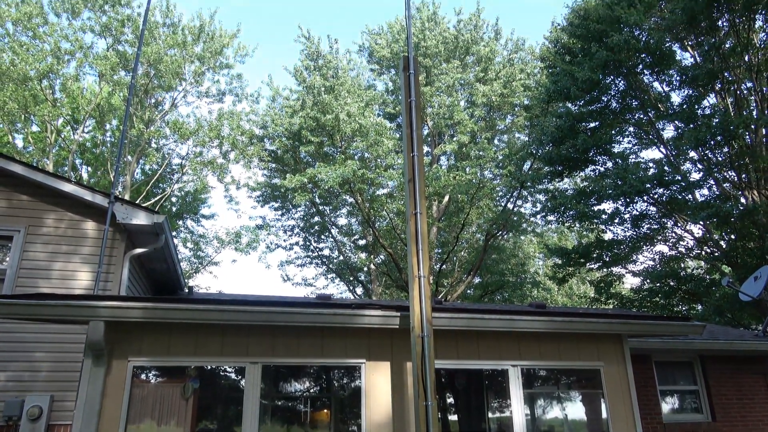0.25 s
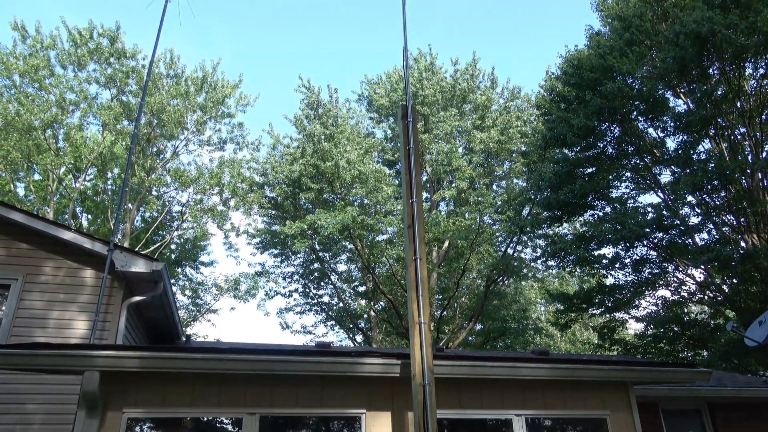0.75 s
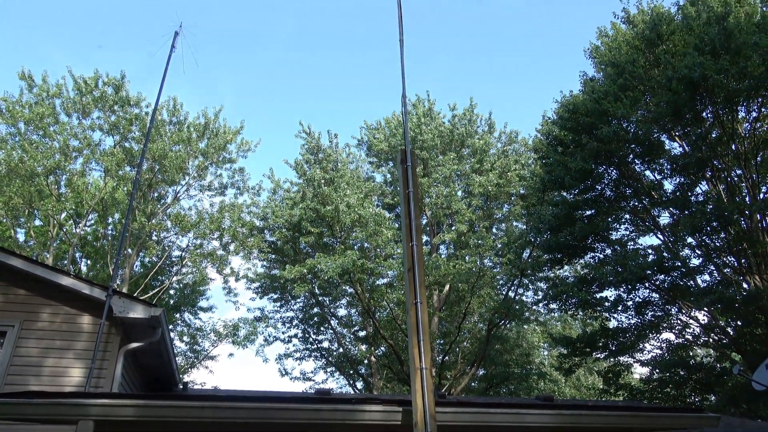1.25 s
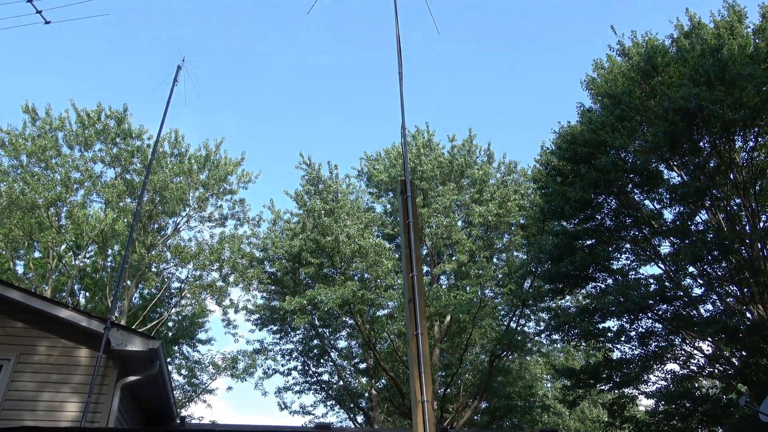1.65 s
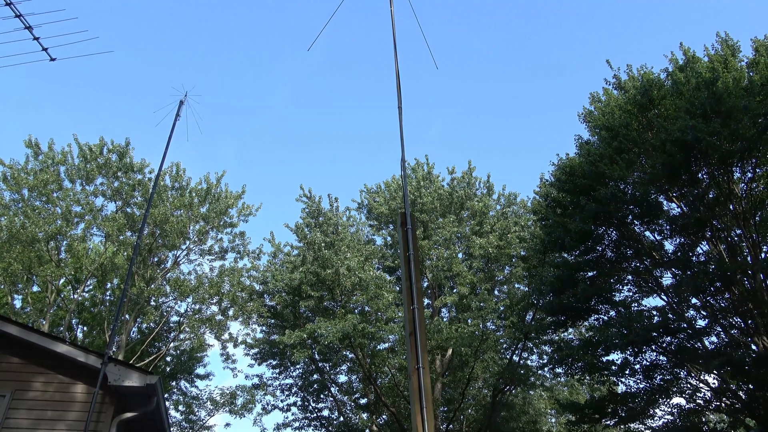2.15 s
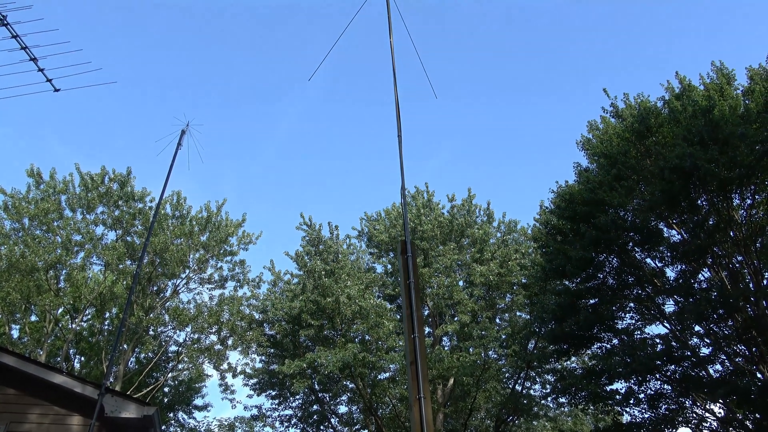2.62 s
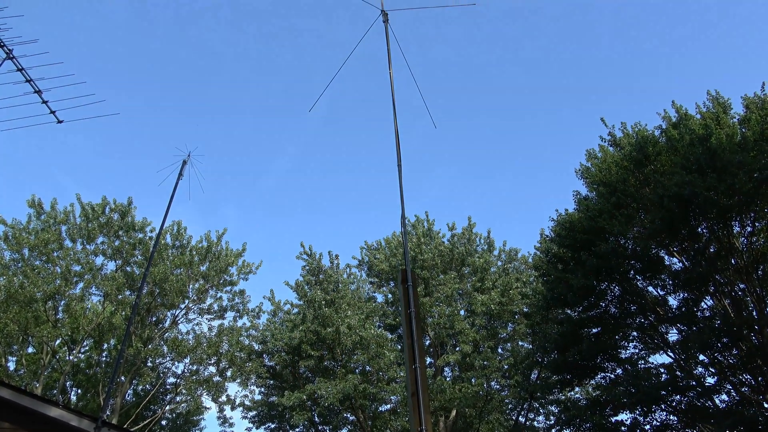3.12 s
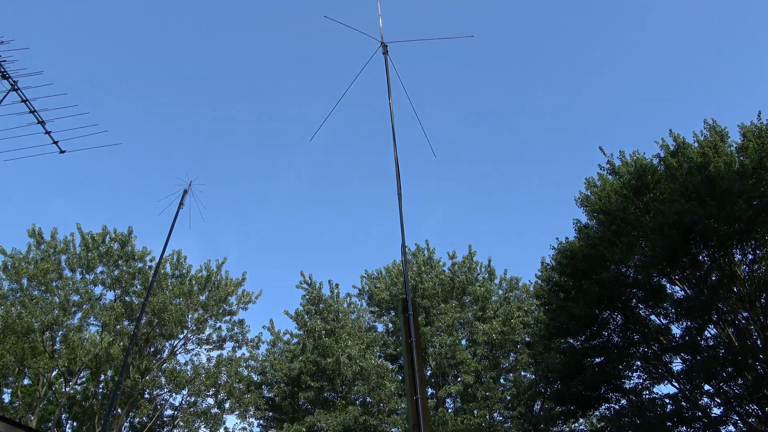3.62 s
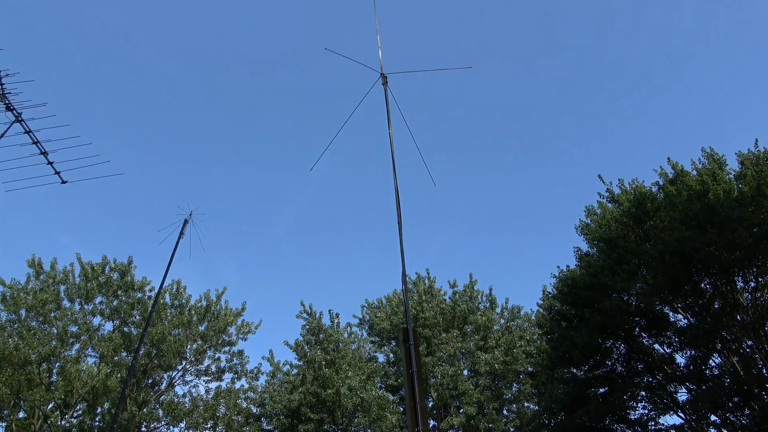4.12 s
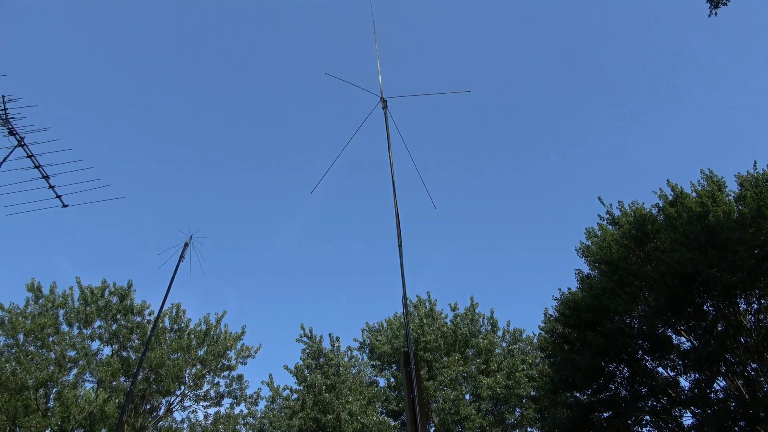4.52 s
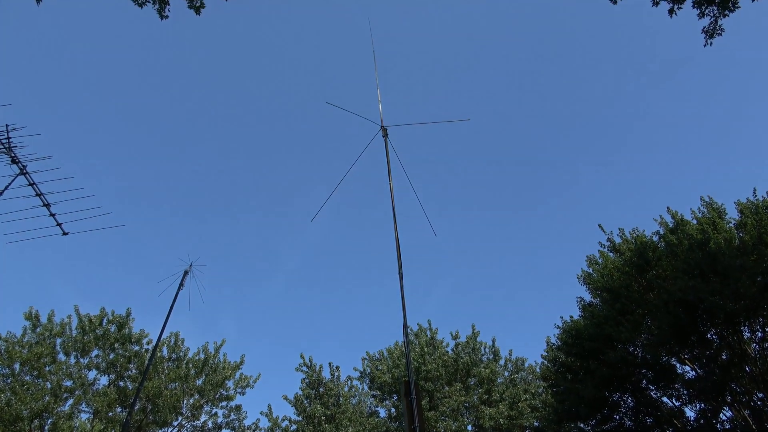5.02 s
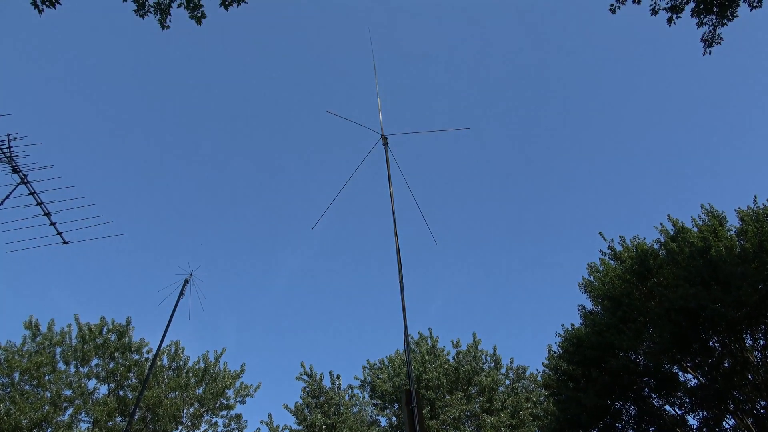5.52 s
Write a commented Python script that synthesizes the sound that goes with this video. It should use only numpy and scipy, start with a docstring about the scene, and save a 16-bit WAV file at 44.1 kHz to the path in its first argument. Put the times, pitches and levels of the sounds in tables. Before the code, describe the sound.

In a tree-lined garden beside a house, a nearby songbird whistles two short falling calls, then sings a long run of quick, high repeated chirps that slows a little. Each note echoes lightly off the wall. Other birds twitter faintly further off, over steady town rumble, hiss and a soft swell of distant traffic. Near the end the hand-held microphone picks up soft thumps and a click.

```python
"""Songbird in a town garden

A near bird whistles two falling calls, then a run of slur-and-chirp syllables that slows to a drawl.
A house wall throws each note back; other birds call further off, half lost in the leaves.
Town rumble, hiss and a swell of traffic lie under it; the hand-held camera clicks and thumps."""
import sys
import numpy as np
from scipy import signal
from scipy.fft import rfft, irfft, next_fast_len
from scipy.io import wavfile
from scipy.ndimage import uniform_filter1d

SR = 44100
rng = np.random.default_rng(int(sys.argv[2]) if len(sys.argv) > 2 else 0)


def put_to_file(sound):
    """Save the sound as 16-bit audio at rate SR, in the file named by the first command-line argument."""
    columns = np.atleast_2d(sound).T  # one column per channel
    safe = np.clip(columns, -1, 1)
    whole_steps = np.round(safe * 32767)
    wavfile.write(sys.argv[1], SR, whole_steps.astype(np.int16))


N = 254280


def undb(db):
    return 10 ** (np.asarray(db) / 20)


def decay(age, t60):
    return np.exp(-np.log(1000) * age / t60)


def wander(rate_hz):
    """Smooth random drift with a spread of 1."""
    width = max(int(SR / rate_hz), 1)
    drift = uniform_filter1d(uniform_filter1d(rng.standard_normal(N), width), width)
    return drift / drift.std()


def whistle(out, s, hz, db, wobble_hz=None):
    """Adds a sine that follows points of time, pitch and level, with 2 ms fades."""
    i = np.arange(max(int(s[0] * SR), 0), min(int(s[-1] * SR), N))
    t = i / SR
    fade = np.clip(np.minimum(t - s[0], s[-1] - t) / .002, 0, 1)
    pitch = np.interp(t, s, hz) + (0 if wobble_hz is None else wobble_hz[i])
    out[i] += fade * undb(np.interp(t, s, db)) * np.sin(2 * np.pi * np.cumsum(pitch) / SR)


def delay(x, s):
    """Delays by s seconds, down to a fraction of a sample."""
    size = next_fast_len(N + SR)
    shift = np.exp(-2j * np.pi * np.fft.rfftfreq(size, 1 / SR) * s)
    return irfft(rfft(x, size) * shift, size)[..., :N]


# The tone of the town bed. Each row: frequency in Hz, relative level in dB.
TOWN_SPECTRUM = [(20, -5.5), (45, -11.5), (58, 3), (72, -7), (146, -18), (350, -5.5), (510, -11), (680, -7),
                 (790, -11.5), (1050, -7), (1500, -13), (2400, -21.5), (3400, -21), (4900, -17),
                 (6400, -23.5), (8000, -18), (9300, -29.5), (16000, -34.5)]
# Its width. Each row: frequency in Hz, left-right likeness from 0 to 1.
TOWN_LIKENESS = [(60, 0.89), (130, 0.79), (290, 0.97), (640, 0.95), (1410, 0.96), (3100, 0.56),
                 (6820, 0.12), (15000, 0)]
# Its balance. Each row: frequency in Hz, left minus right in dB.
TOWN_BALANCE = [(60, 0.5), (300, -1.4), (1300, -1), (8000, -0.6)]


def town(level_db=-44.5):
    """Rumble and hiss: octave bands of noise that flicker a little, narrow in the bass, wide on top."""
    hz = np.maximum(np.fft.rfftfreq(N, 1 / SR), 1)
    def curve(table):
        points_hz, values = np.transpose(table)
        return np.interp(np.log(hz), np.log(points_hz), values)
    likeness = np.clip(curve(TOWN_LIKENESS), 0, 1)
    noise = rfft(rng.standard_normal((2, N))) * undb(curve(TOWN_SPECTRUM))
    mid, side = noise * np.sqrt([1 + likeness, 1 - likeness])
    lean = undb(curve(TOWN_BALANCE) / 2)
    stereo = np.array([(mid + side) * lean, (mid - side) / lean])
    bed, swell_db = 0, .29 * wander(.167)
    for octave in range(4, 15):
        band = np.cos(np.pi / 2 * np.clip(np.log2(hz) - octave, -1, 1)) ** 2
        bed += irfft(stereo * band, N) * undb(swell_db + .3 * wander(24))
    return bed * undb(level_db) / np.sqrt(np.mean(bed.mean(0) ** 2))


def leaves(x, t60, likeness, flutter_db):
    """Trunks and leaves return a fading stereo cloud of reflections; moving leaves make it flutter."""
    t = np.arange(SR) / SR
    mid, side = rng.standard_normal((2, SR)) * decay(t, t60) * np.clip(t / .005, 0, 1)
    tail = np.sqrt(1 + likeness) * mid + np.sqrt(1 - likeness) * np.array([side, -side])
    tail /= np.sqrt(np.sum(tail ** 2) / 2)
    cloud = signal.fftconvolve(x[None], tail, axes=1)[:, :N]
    return cloud * undb(flutter_db * wander(53))


# A far note has four points: their place along its length, and its envelope there in dB.
NOTE_POINTS, NOTE_ENVELOPE_DB = np.array([0, .25, .7, 1]), np.array([-4, 0, 0, -7])
# Hissy chips that sag a little. Each row: start in seconds, pitch in Hz, level in dB.
SAGGING_CHIPS = [(0.0, 7560, -50), (0.0, 9100, -51), (.17, 9300, -50), (.17, 6850, -50), (.65, 9000, -55),
                 (0.987, 8640, -49.5), (1.3, 7040, -54), (2.003, 8660, -53), (2.308, 7270, -48),
                 (2.59, 8000, -46.5), (2.61, 6860, -48), (2.935, 7200, -43.5), (3.289, 8040, -47),
                 (4.694, 5310, -44.5), (4.959, 5720, -43.5)]
# Thin, steady whistles. Each row: start and length in seconds, level in dB.
THIN_PEEPS = [(.8, .12, -63), (1.105, .15, -58), (1.4, .2, -61)]
# Lone glides. Each row: start and length in seconds, nominal first and last pitch in Hz, level in dB.
LONE_GLIDES = [(1.714, .058, 5240, 4690, -44.5), (3.226, 0.037, 2965, 2536, -37),
               (3.745, .074, 2360, 2825, -39)]
# High, arching whistles. Each row: start and length in seconds, top pitch in Hz, level in dB.
HIGH_SEEPS = [(1.75, .07, 7580, -54), (2.2, 0.18, 7570, -54.5), (2.64, .18, 7660, -51.5),
              (3.183, .1, 7750, -51), (3.752, 0.13, 7600, -50), (4.457, .23, 7720, -51),
              (5.002, 0.22, 7660, -51), (5.435, .15, 7730, -39.5)]
# Short, burry pips. Each row: start in seconds, level in dB.
BURRY_PIPS = [(2.453, -45), (2.795, -42.5), (3.15, -40), (4.112, -44.5), (4.373, -45)]
# Steeply falling rasps. Each row: start and length in seconds, first pitch in Hz, level in dB.
FALLING_RASPS = [(2.673, 0.062, 7350, -37.5), (2.999, 0.084, 7480, -36.5), (4.147, .034, 6550, -35.5),
                 (4.391, 0.034, 6740, -35.5)]
# Evenly spaced two-voiced ticks. Each row: level of the low voice, then of the high voice, in dB.
TICK_LEVELS = [(-44, -57), (-43, -41.5), (-37.5, -42), (-38, -40)]
# Low churrs. Each row: start in seconds, pitch in Hz, level in dB.
LOW_CHURRS = [(3.304, 4210, -42.5), (3.42, 4130, -42), (3.531, 4150, -39), (3.639, 4000, -40),
              (3.775, 4040, -42), (3.88, 3940, -43), (3.99, 4070, -42), (4.277, 3820, -40),
              (4.535, 3825, -40), (4.68, 4620, -40), (4.978, 4550, -40)]


def distant_birds():
    """Far calls: a quick pitch wobble makes them buzz, and turbulent air makes the level shiver."""
    into_trees, direct = np.zeros((2, N))
    wobble = wander(1100)
    def note(s, length, hz, db, glide, buzz_hz):
        times, pitch = s + length * NOTE_POINTS, hz * np.array(glide)
        buzz = .7 * buzz_hz * wobble
        depth_db = buzz_hz / 70  # raspy callers sit deeper in the trees
        whistle(into_trees, times, pitch, db + NOTE_ENVELOPE_DB, buzz)
        whistle(direct, times, pitch, db + NOTE_ENVELOPE_DB - depth_db, buzz)
    for s, hz, db in SAGGING_CHIPS:
        note(s, .058, hz, db, glide=(1.001, .985, .955, .935), buzz_hz=450)
    for s, length, db in THIN_PEEPS:
        note(s, length, 5020, db, glide=(1.001, 1.001, .998, .996), buzz_hz=40)
    for s, length, first_hz, last_hz, db in LONE_GLIDES:
        sweep_hz = first_hz + (last_hz - first_hz) * NOTE_POINTS
        note(s, length, sweep_hz, db, glide=.99, buzz_hz=152)  # 1 % flat throughout
    for s, length, hz, db in HIGH_SEEPS:
        note(s, length, hz, db, glide=(.94, .965, 1.001, .985), buzz_hz=110)
    for s, db in BURRY_PIPS:
        note(s, .065, 5770, db, glide=(.97, .995, 1.001, .84), buzz_hz=300)
    for s, length, hz, db in FALLING_RASPS:
        note(s, length, hz, db, glide=(1.001, .84, .68, .62), buzz_hz=598)
    for k, (low_db, high_db) in enumerate(TICK_LEVELS):
        s = 3.198 + k * .1355
        note(s, .0273, 4950, low_db, glide=(1, .96, .9, .86), buzz_hz=90)
        note(s + .0066, .0273, 7000, high_db, glide=(1, .98, .955, .95), buzz_hz=90)
    for s, hz, db in LOW_CHURRS:
        note(s, .0696, hz, db, glide=(.96, .99, 1.01, 1.015), buzz_hz=233)
    into_trees += flock(wobble)  # heard only as reflections
    direct *= undb(1 + 2 * wander(130))
    cloud = leaves(into_trees, t60=.45, likeness=.43, flutter_db=0)
    return (direct + cloud) * undb([[-.5], [.5]])


def songbird(wall_s=.0539, left_late_s=.000034):
    """The near bird, a little right of centre, with its slap off the wall and its wash in the leaves."""
    song, toward_wall = opening_calls() + syllable_run()
    echo = delay(toward_wall, wall_s)
    song *= undb(2.6 * wander(220))  # turbulent air on the way
    cloud = undb(-2.5) * leaves(song + echo, t60=.29, likeness=.55, flutter_db=2.5)
    left, right = song + echo * undb([[-1.5], [1.5]]) + cloud
    return np.array([delay(left, left_late_s), right]) * undb([[-.2], [.2]])


def sing(song, toward_wall, s, hz, db, echo_db):
    """One whistle goes straight to the listener and, offset by echo_db, toward the wall."""
    whistle(song, s, hz, db)
    whistle(toward_wall, s, hz, db + echo_db)


# The call's three whistles. Each point: time from the flick in ms, pitch in Hz, relative level in dB.
CALL_WHISTLES = [
    [(-83.5, 3490, -6.5), (-57, 3240, 0.5), (-39, 3080, -2), (-23.5, 3040, -0.5)],
    [(0, 1930, -8), (16.9, 2340, -2), (28.6, 2415, 2)],
    [(71.5, 2070, -25), (135.2, 1960, -1), (209, 1900, -7), (332.4, 1800, -9), (437, 1710, -26)],
]
# The two calls. Each row: time of the flick in seconds, level in dB, first pitch in Hz.
OPENING_CALLS = [(.832, -42.5, 3710), (1.874, -37, 3270)]


def opening_calls():
    """Each call is a whistled fall, a flick upward and a long sag."""
    song, toward_wall = np.zeros((2, N))
    fall, flick, sag = CALL_WHISTLES
    for s, db, first_hz in OPENING_CALLS:
        onset = (-100, first_hz, -11)  # a low first pitch hooks up into the fall
        for shape in ([onset, *fall], flick, sag):
            ms, hz, shape_db = np.transpose(shape)
            sing(song, toward_wall, s + ms / 1000, hz, db + shape_db, echo_db=-3.5)
    return np.array([song, toward_wall])


# The slur, brisk and drawled. Each row: time from its crest in ms, share of crest pitch, relative dB.
BRISK_SLUR = [(-55, .66, -19), (-23.5, .84, -15.5), (-18, .87, -6.5), (-8, .955, -3), (3, 1.005, -1),
              (12.5, 0.962, -18)]
DRAWLED_SLUR = [(-67, 0.83, -15), (-48, .81, -10.5), (-21, .87, -8), (-7.5, .93, -4), (1, 1.01, -1),
                (13.5, 1.072, -8)]
# The chirp: a snap down, then a brisk or drawled rise.
# Each row: time in ms, share of the chirp's pitch, relative level in dB.
CHIRP_DROP = [(-4.2, 1.27, -9), (-2, 1.08, -6), (1.5, .78, -8)]
BRISK_CHIRP_RISE = [(3.48, 0.747, -6), (9.24, .89, -4), (15.4, 1.014, -2.5), (21.1, 1.006, -4.5),
                    (26.9, 0.946, 1.5)]
DRAWLED_CHIRP_RISE = [(3.46, 0.817, -1), (8.5, .9, -4.5), (14, .975, -2), (19.5, 1.02, -4.5),
                      (24, 1.01, -17)]
# How the delivery relaxes. Each row: time in seconds, drawl from 0 (brisk) to 1.
DRAWL_CURVE = [(3.48, 0), (3.64, 0.23), (3.8, 0.17), (4.0, .2), (4.17, 0.97)]
# The song. Each row: time of the chirp in seconds, its pitch in Hz, level in dB, wall send in dB.
SONG_SYLLABLES = [(2.474, 3083, -31.5, -7), (2.6436, 3116, -29.5, -7), (2.809, 3190, -28.5, -5),
                  (2.9733, 3147, -27, -6), (3.138, 3133, -27.5, -2.5), (3.3075, 3145, -27.5, -5.5),
                  (3.469, 3110, -27.5, -7), (3.6413, 3103, -26.5, -5.5), (3.809, 3100, -28, -6),
                  (3.9888, 3088, -28.5, -5), (4.1905, 3030, -30.5, -2), (4.3928, 3025, -30.5, -1.5),
                  (4.5905, 2993, -31.5, -2.5), (4.7916, 2966, -30.5, -1.5), (4.991, 3010, -30.5, -2.5),
                  (5.203, 3040, -32, -1.5), (5.4077, 2985, -32.5, -0.5), (5.6226, 3045, -33, -0.5)]


def syllable_run():
    """Rising slurs, each with a chirp; the bird turns its head, so the echo changes note by note."""
    song, toward_wall = np.zeros((2, N))
    for s, hz, db, echo_db in SONG_SYLLABLES:
        drawl = np.clip(np.interp(s, *np.transpose(DRAWL_CURVE)), 0, 1)
        def blend(brisk, drawled):
            return (1 - drawl) * np.array(brisk) + drawl * np.array(drawled)
        ms, share, shape_db = blend(BRISK_SLUR, DRAWLED_SLUR).T
        slur_s = s - .0285 + ms / 1000  # crests just ahead of the chirp
        slur_hz = hz * blend(.685, .645) * share
        slur_db = db + blend(-1.43, -2.5) + shape_db
        head_turn_db = 2.5 * rng.standard_normal()
        sing(song, toward_wall, slur_s, slur_hz, slur_db, blend(-8, -10.5) + head_turn_db)
        # The fourth harmonic grows faster than the breath pressure and breaks through on loud slurs.
        whistle(song, slur_s, 4 * slur_hz, -35.5 + 4 * (slur_db + 28))
        drop = np.array(CHIRP_DROP) + [0, 0, 4 * drawl]  # drawled chirps lean harder on the drop
        rise = blend(BRISK_CHIRP_RISE, DRAWLED_CHIRP_RISE)
        for shape, send_db in ((drop, echo_db - 3), (rise, echo_db)):  # the wall returns less of the drop
            ms, share, shape_db = shape.T
            sing(song, toward_wall, s + ms / 1000, hz * share, db + shape_db, send_db)
    return np.array([song, toward_wall])


# The traffic's swell. Each row: time in seconds, level in dB.
TRAFFIC_SWELL = [(1.501, -81), (2.6, -48), (3.5, -48.5), (4.2, -45.5), (4.749, -45.5), (5.2, -50),
                 (5.77, -46.5)]


def traffic(centre_hz=1316.4, half_width_hz=450):
    """Tyre roar from a street away: a broad band of noise that swells."""
    t = np.arange(N) / SR
    lowpass = signal.butter(2, half_width_hz, fs=SR, output="sos")
    noise = signal.sosfilt(lowpass, rng.standard_normal((3, N)))
    phase = 2 * np.pi * centre_hz * t
    mid = noise[0] * np.cos(phase) + noise[1] * np.sin(phase)
    side = .25 * noise[2] * np.cos(phase)
    roar = np.array([mid + side, mid - side])
    level_db = np.interp(t, *np.transpose(TRAFFIC_SWELL), left=-99) + 1.5 * wander(5)
    return roar / roar.std() * undb(level_db)


# The flock's swell. Each row: time in seconds, level of each note in dB.
FLOCK_SWELL = [(2.3, -59), (2.7, -48), (3.5, -45), (4.3, -48.5), (5.77, -48.5)]


def flock(wobble, notes=400, note_s=.0309):
    """A flock too far off to tell notes apart: a blur of tiny buzzy glides."""
    chatter = np.zeros(N)
    swell_s, swell_db = np.transpose(FLOCK_SWELL)
    for when, pitch, bend in rng.random((notes, 3)):
        s = swell_s[0] + when * (swell_s[-1] - swell_s[0])
        octaves = 1.6 * pitch + (bend - .6) * .413 * NOTE_POINTS
        db = np.interp(s, swell_s, swell_db) + NOTE_ENVELOPE_DB
        whistle(chatter, s + note_s * NOTE_POINTS, 2400 * 2 ** octaves, db, wobble_hz=200 * wobble)
    return chatter


# Hand thumps. Each row: start in seconds, level in dB before the fade-in, pitch in Hz, t60 in seconds.
HAND_THUMPS = [(4.71, -31.5, 60.6, 0.19), (4.87, -31.5, 42, 0.19), (5.66, -31, 58.6, 0.61),
               (5.669, -38, 164, 0.15)]
# The ring of the case. Each row: frequency in Hz, relative level in dB, t60 in seconds.
CASE_MODES = [(950, -3, .013), (1500, -4, .009), (3000, -9, .003), (4700, -2.5, .004), (7200, -2.5, .003),
              (10800, -3, .002)]


def handling(click_s=4.8635, click_db=-18, thump_fade_s=.028):
    """Soft thumps of the hand and one plastic click in the camera case."""
    t = np.arange(N) / SR
    def ring(s, db, hz, t60):
        age = np.maximum(t - s, 0)
        return undb(db) * decay(age, t60) * np.sin(2 * np.pi * hz * age)
    out = sum(ring(click_s, click_db + db, hz, t60) for hz, db, t60 in CASE_MODES)
    for s, db, hz, t60 in HAND_THUMPS:
        out += np.clip((t - s) / thump_fade_s, 0, 1) * ring(s, db, hz, t60)
    return out * undb([[-.5], [.5]])


def scene():
    """Everything at the two microphones."""
    return songbird() + distant_birds() + town() + traffic() + handling()


def record(dry):
    """The camera cuts the top steeply at 15.8 kHz."""
    return signal.sosfilt(signal.ellip(10, .2, 70, 15800, fs=SR, output="sos"), dry)


dry = scene()
out = record(dry)
put_to_file(out)
```